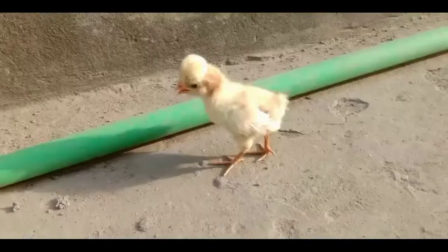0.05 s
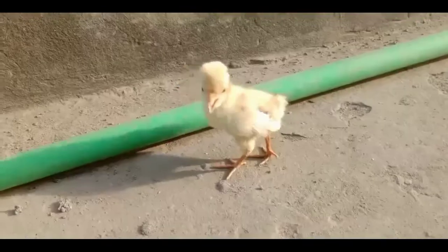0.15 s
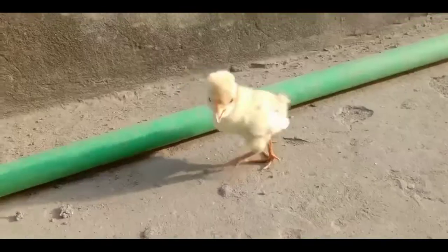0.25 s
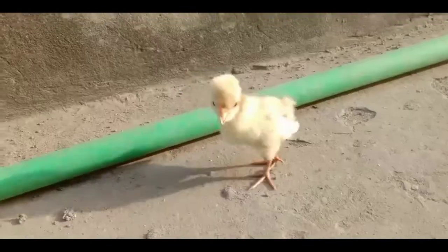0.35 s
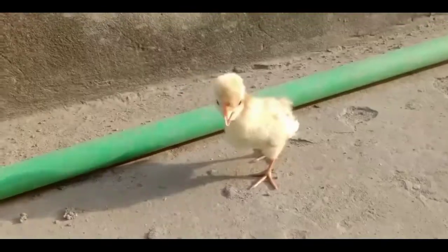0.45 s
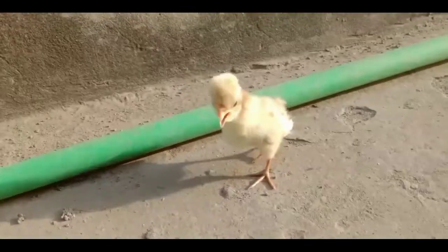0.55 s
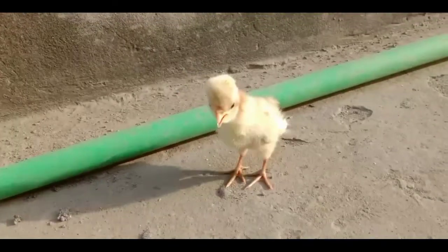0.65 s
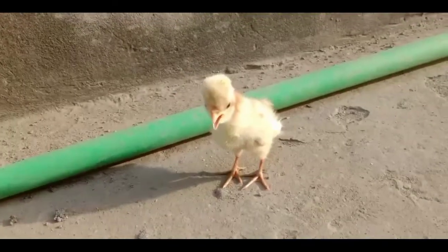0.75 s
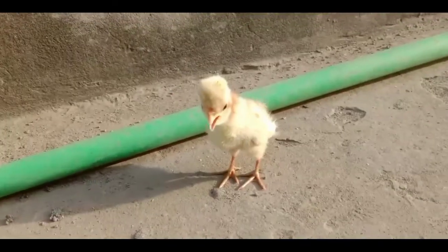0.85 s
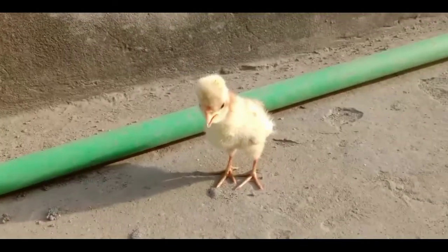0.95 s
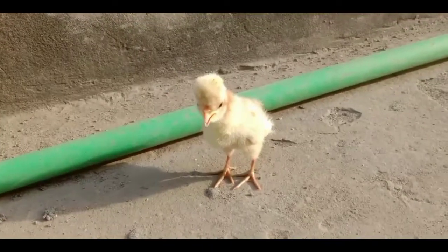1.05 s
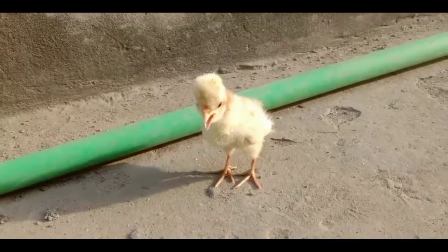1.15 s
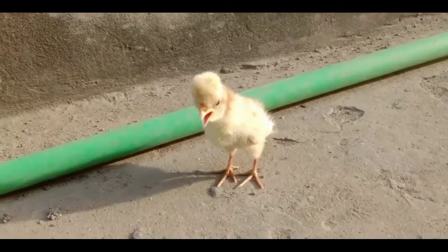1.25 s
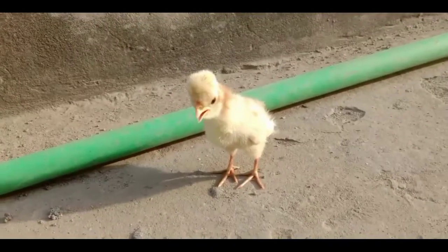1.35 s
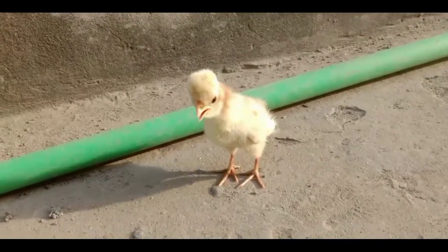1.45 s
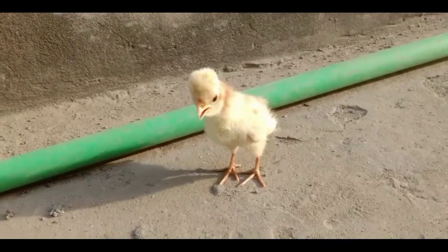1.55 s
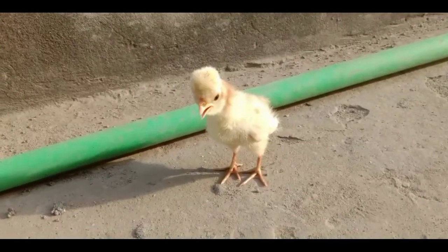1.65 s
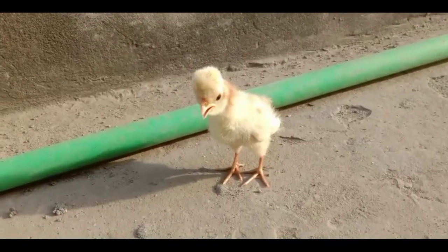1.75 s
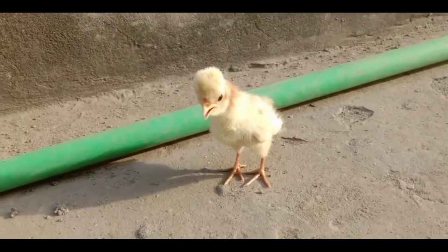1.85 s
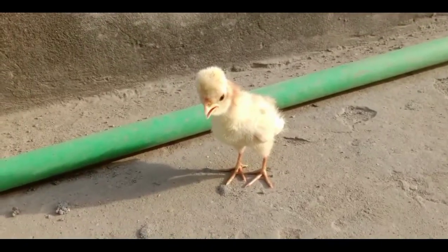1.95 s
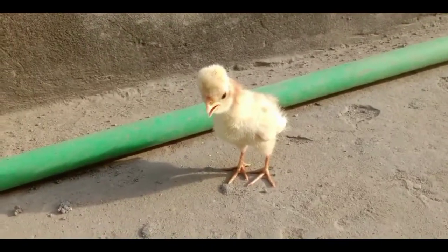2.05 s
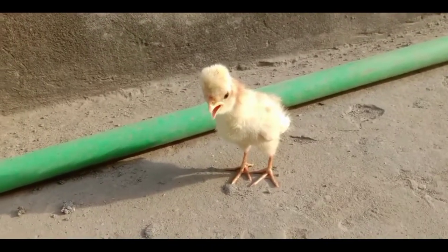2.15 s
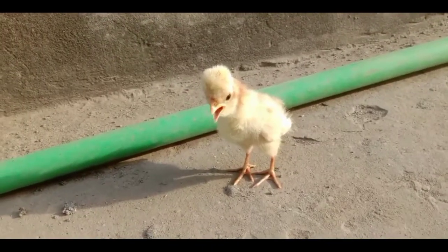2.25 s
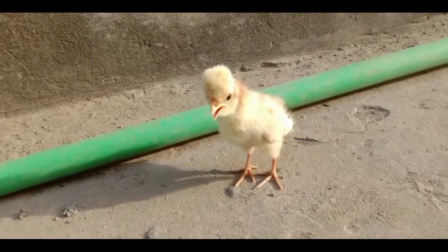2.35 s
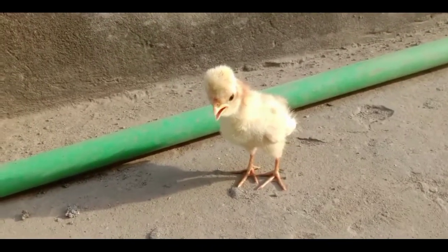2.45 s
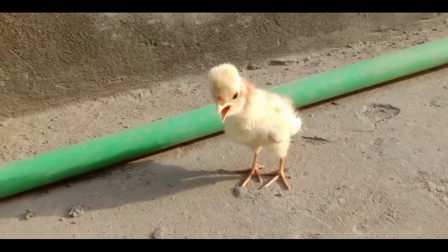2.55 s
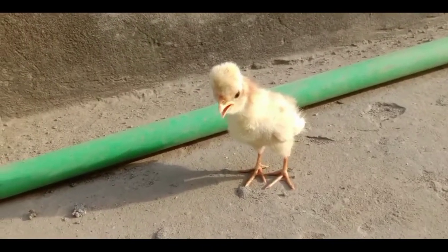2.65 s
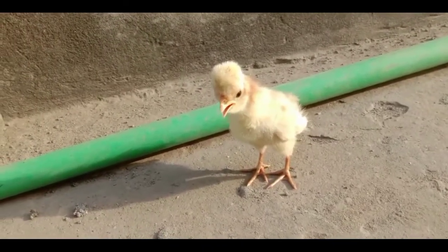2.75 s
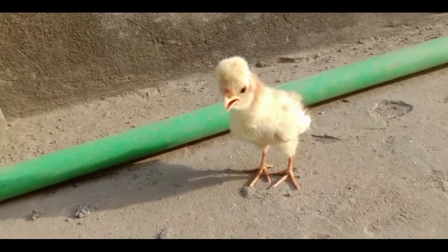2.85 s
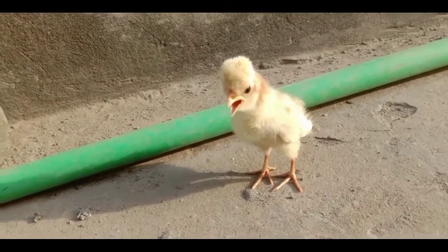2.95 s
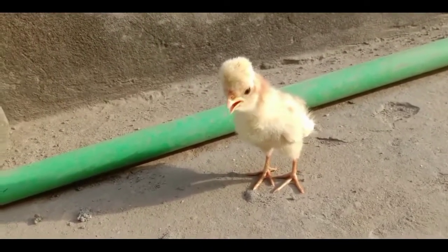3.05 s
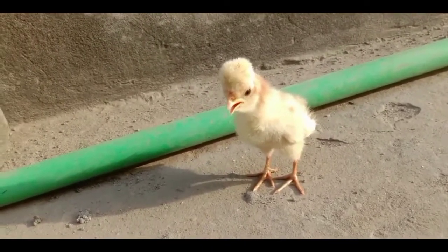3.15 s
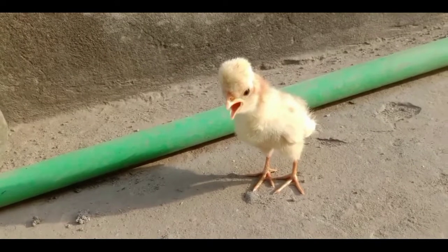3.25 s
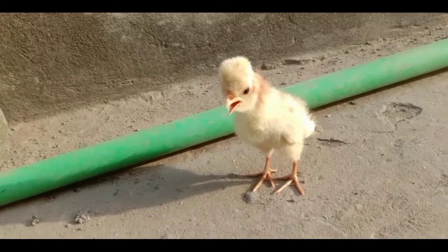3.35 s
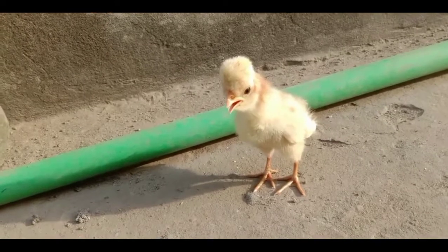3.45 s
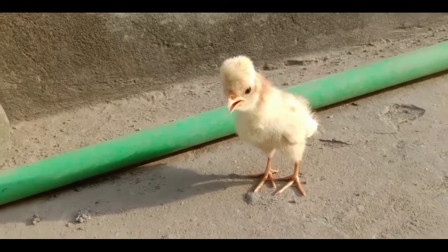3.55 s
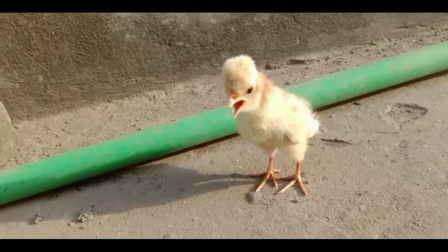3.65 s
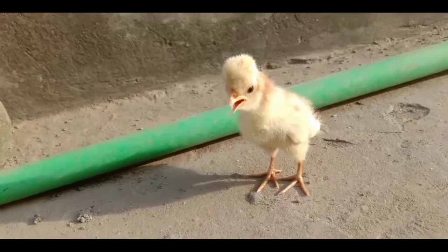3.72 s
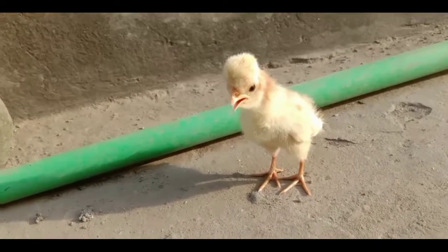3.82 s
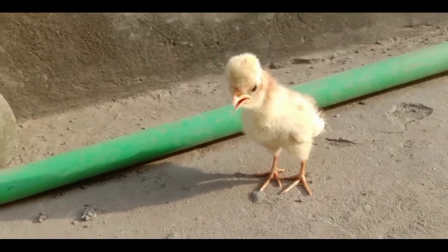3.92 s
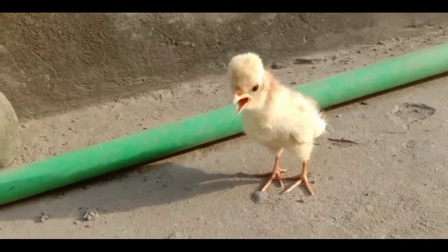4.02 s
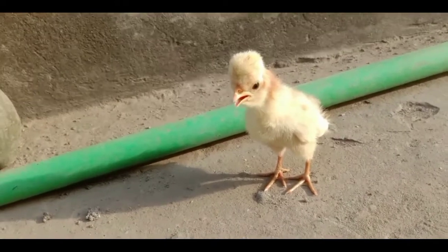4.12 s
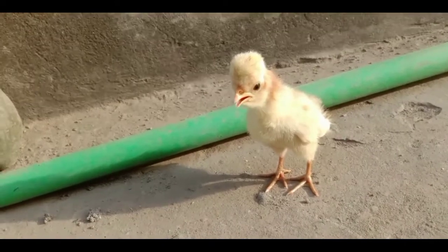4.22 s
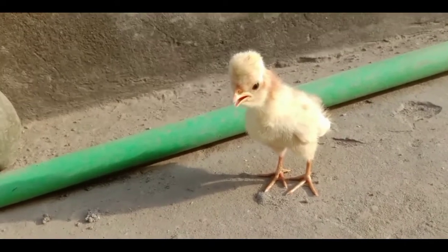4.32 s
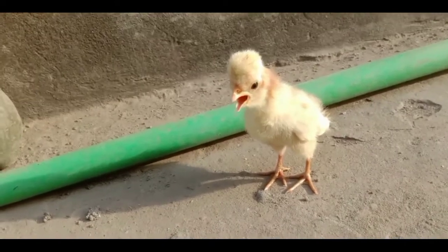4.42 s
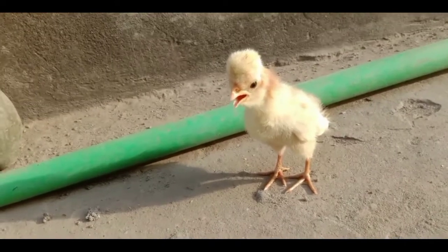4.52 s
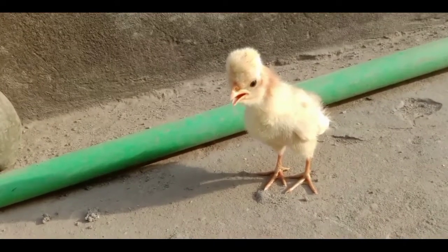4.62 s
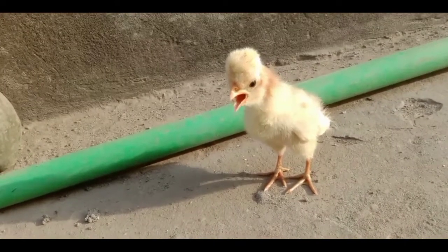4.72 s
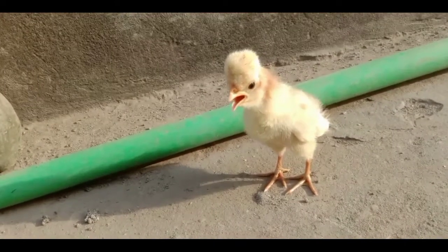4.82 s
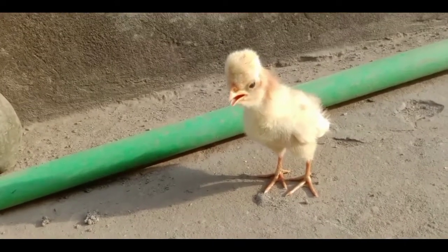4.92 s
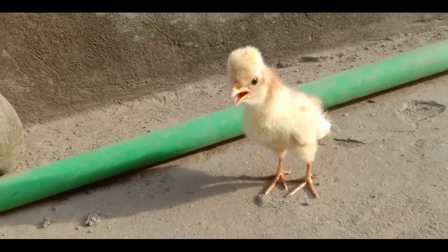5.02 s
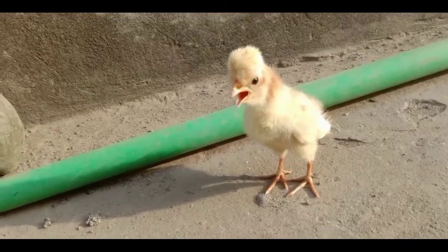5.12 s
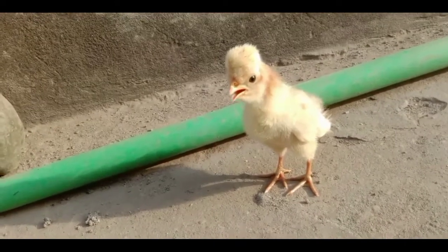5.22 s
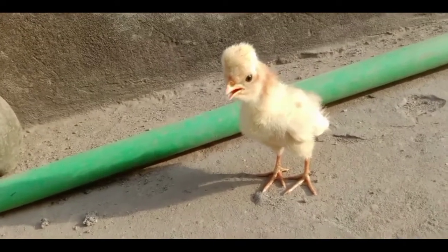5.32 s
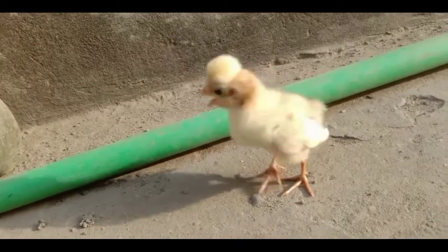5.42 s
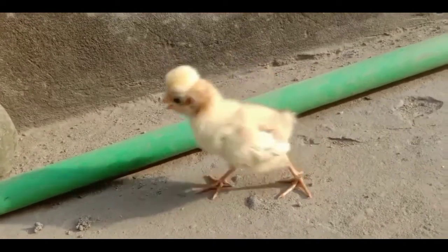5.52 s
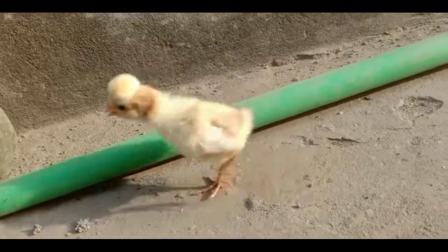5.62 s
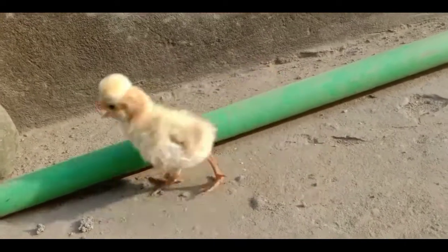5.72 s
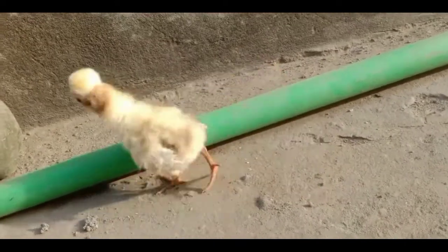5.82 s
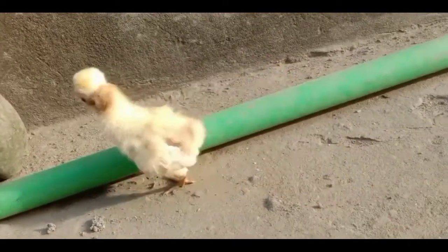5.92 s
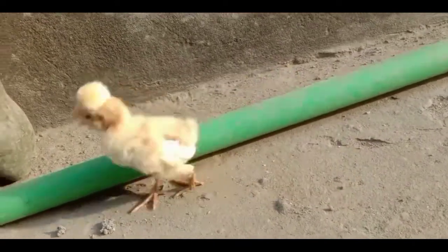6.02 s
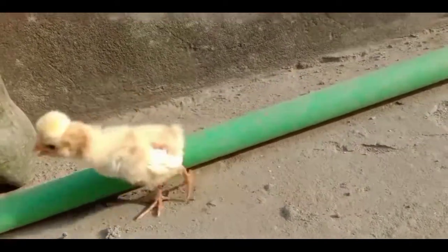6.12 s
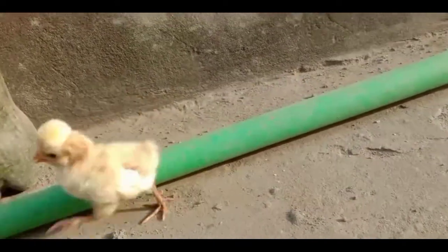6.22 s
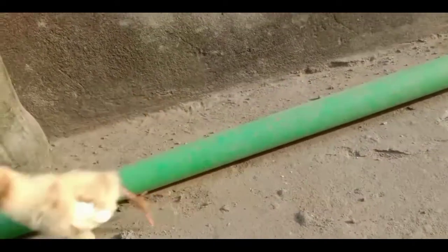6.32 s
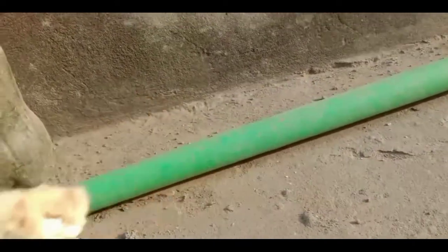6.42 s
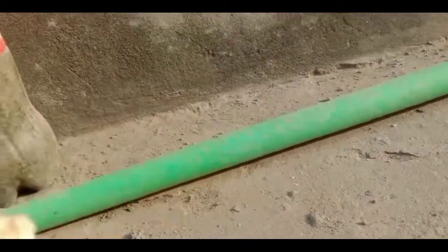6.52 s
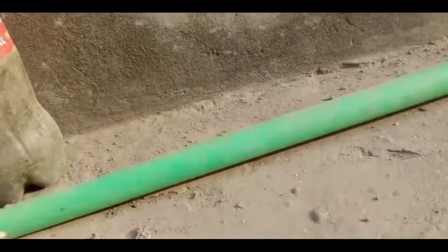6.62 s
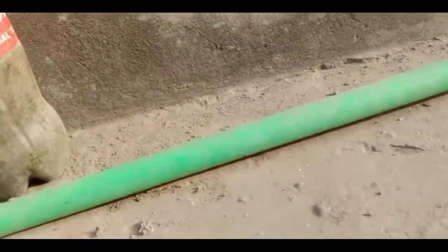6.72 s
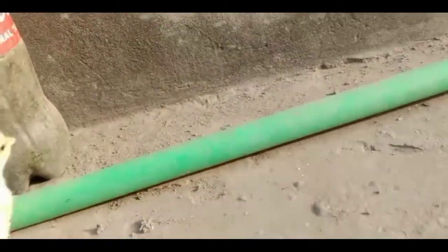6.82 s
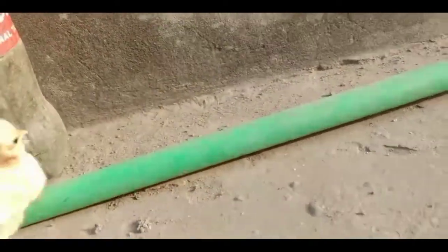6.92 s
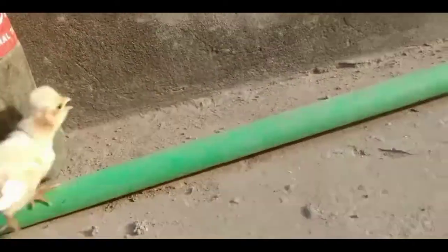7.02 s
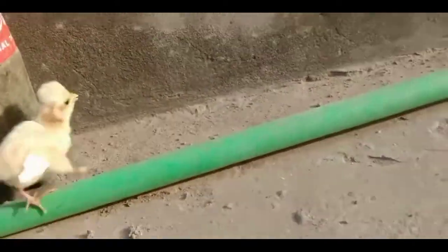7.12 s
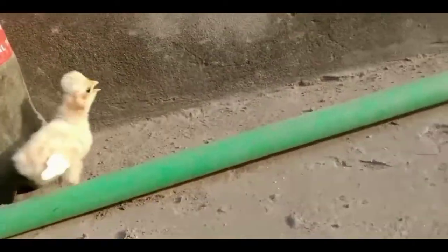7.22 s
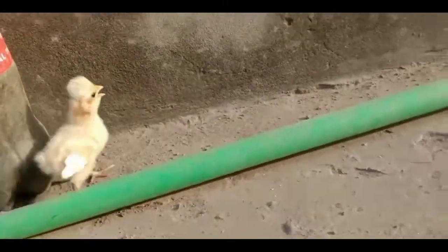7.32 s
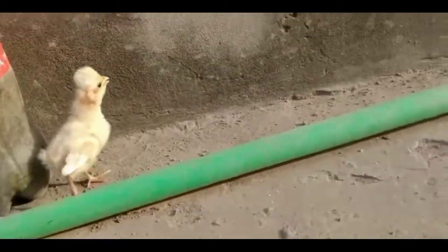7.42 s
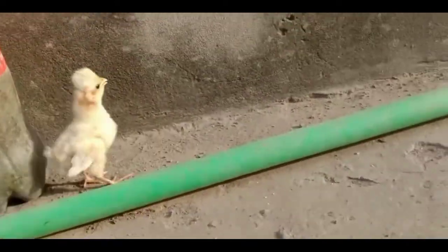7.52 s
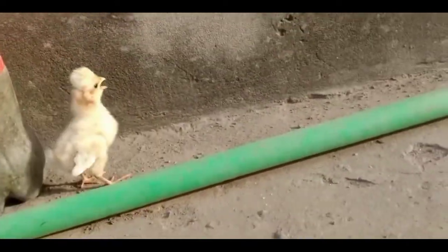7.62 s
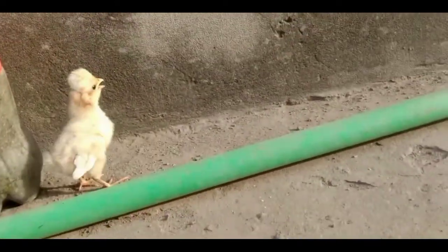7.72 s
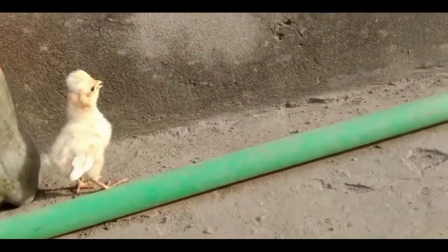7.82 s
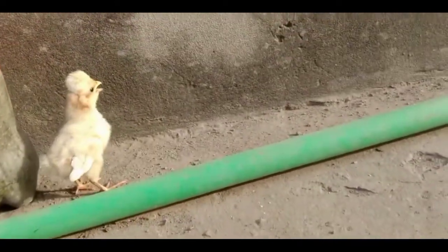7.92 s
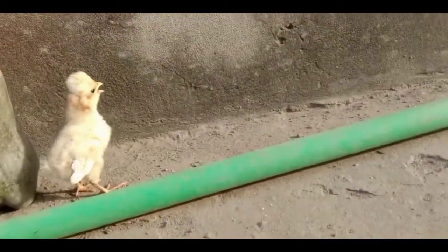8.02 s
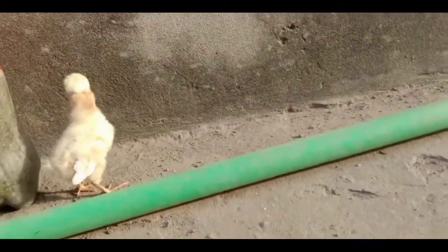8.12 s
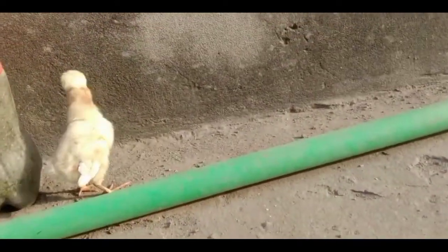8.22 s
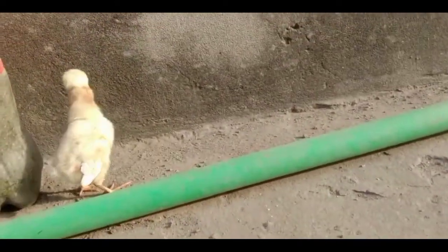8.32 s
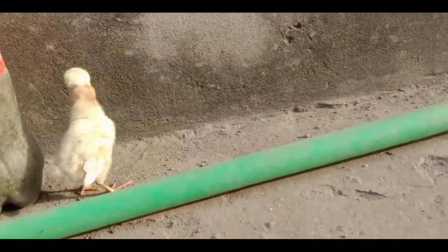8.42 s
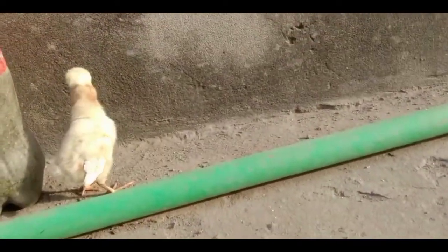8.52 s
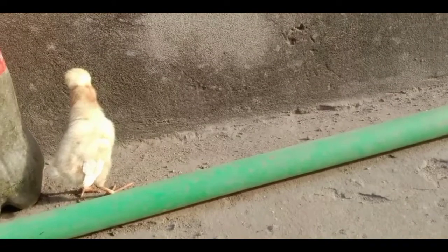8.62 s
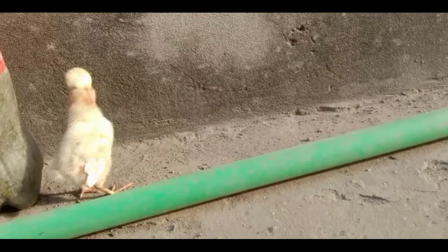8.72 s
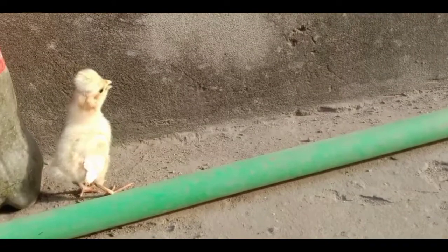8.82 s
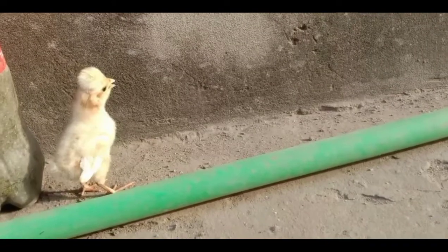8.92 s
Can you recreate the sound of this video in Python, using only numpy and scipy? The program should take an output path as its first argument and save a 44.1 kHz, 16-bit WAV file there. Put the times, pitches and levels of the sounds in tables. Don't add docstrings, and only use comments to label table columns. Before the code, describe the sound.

A short loud burst of yard noise cuts to near silence, then a close chick starts peeping, shrill and regular, each peep dropping sharply in pitch. Fainter chicks cheep irregularly behind it. Small hollow taps of beaks and feet and a few soft hen clucks sit under a low hum. Concrete yard by a wall, phone microphone close.

```python
import sys
import numpy as np
from scipy import signal
from scipy.io import wavfile
from scipy.ndimage import uniform_filter1d

SR = 44100
rng = np.random.default_rng(int(sys.argv[2]) if len(sys.argv) > 2 else 0)


def invert_db(level):
    return 10 ** (np.asarray(level, dtype=float) / 20)


def wrap_up_sound(samples):
    columns = np.atleast_2d(samples).T
    tamed = np.clip(columns, -1, 1)
    steps = np.round(tamed * 32767).astype(np.int16)
    wavfile.write(sys.argv[1], SR, steps)


N = 395136
TOP_HZ = 15800


def at_hz(points, hz):
    point_hz, point_db = np.transpose(points)
    return np.interp(np.log(hz), np.log(point_hz), point_db)


def drift(rate_hz):
    r = np.exp(-2 * np.pi * rate_hz / SR)
    slow = signal.lfilter([1], [1, -2 * r, r * r], rng.standard_normal(N + SR))[SR:]
    return slow / slow.std()


def bandpass(order, low_hz, high_hz, x):
    return signal.sosfilt(signal.butter(order, [low_hz, high_hz], "band", fs=SR, output="sos"), x)


def lowpass(order, top_hz, x):
    return signal.sosfilt(signal.butter(order, top_hz, fs=SR, output="sos"), x)


def add(out, s, sound):
    at = max(round(s * SR), 0)
    out[at:at + len(sound)] += sound[:N - at]


# (frequency [Hz], density [dB per Hz])
YARD = [(18, -45), (30, -37), (124, -2), (286, -14), (754, -13.5), (930, -12), (1060, -7.5), (2720, -34.5),
        (4040, -37.5), (4980, -17.5), (7370, -73.5), (15800, -59)]
# (time [s], level [dB])
BUSTLE = [
    (0, -28.5),
    (.19, -61),
    (.55, -46),
    (4, -48),
    (5.1, -46.5),
    (5.6, -48),
    (7.4, -50),
    (8, -45.5),
    (8.96, -43.5),
]


def yard():
    edges = 45 * 2 ** np.arange(0, 8.6, .5)
    white = rng.standard_normal((2, N))
    together, own, patches = drift(18.6), drift(55), drift(4.4)
    out = 0
    for k, (low_hz, high_hz) in enumerate(zip(edges, edges[1:])):
        band = bandpass(2, low_hz, high_hz, white[k % 2])
        flicker_db = 2 * together + 1.9 * np.roll(own, k * N // 20) + 3.55 * np.roll(patches, k * N // 19)
        out = out + band * invert_db(at_hz(YARD, np.sqrt(low_hz * high_hz)) + flicker_db)
    bustle_db = np.interp(np.arange(N) / SR, *np.transpose(BUSTLE))
    return invert_db(bustle_db) * (out / out.std() + drone())


# (frequency [Hz], level [dB], swing [dB])
DRONES = [
    (118.8, -3, 2),
    (304, -25, 4),
    (419.4, -12.5, 3.5),
    (737, -17.5, 6),
    (1308, -24, 2),
]


def drone():
    width_hz = 26
    r = np.exp(-np.pi * width_hz / SR)
    out, swing = 0, drift(2.75)
    for k, (hz, db, swing_db) in enumerate(DRONES):
        poles = [1, -2 * r * np.cos(2 * np.pi * hz / SR), r * r]
        ring = signal.lfilter([1, 0, -1], poles, rng.standard_normal(N))
        out = out + invert_db(db + swing_db * np.roll(swing, k * SR)) * ring / ring.std()
    return out


# (time [s], length [s], middle pitch [Hz], effort [dB])
DIVES = [(.621, 0.053, 3650, -44), (.657, 0.048, 3280, -33), (1.021, 0.037, 2990, -26.5),
         (1.305, 0.034, 3390, -27.5), (1.358, 0.036, 3150, -36), (1.445, 0.025, 3250, -29),
         (1.872, .075, 3600, -52), (1.392, 0.047, 3014, -27), (1.613, 0.038, 3260, -27),
         (1.701, 0.032, 3070, -36), (6.2, 0.073, 3750, -52), (6.613, 0.032, 3200, -33),
         (2.974, 0.059, 3440, -35), (8.700, 0.036, 2885, -39), (6.680, 0.033, 2974, -35),
         (5.168, 0.041, 3170, -31.5), (5.229, 0.055, 3350, -34.5), (5.644, 0.028, 3300, -32.5),
         (6.839, 0.054, 3430, -33), (7.140, 0.042, 3290, -36.5), (7.924, 0.035, 3020, -32.5),
         (8.476, 0.041, 3190, -32), (8.905, 0.027, 2820, -23)]
# (time [s], length [s], middle pitch [Hz], effort [dB])
SLIDES = [(.028, 0.033, 3060, -36.5), (.190, 0.037, 3030, -37), (.382, 0.044, 3360, -35.5),
          (.953, 0.049, 3630, -43), (1.066, 0.057, 3320, -30), (1.087, 0.041, 3510, -34.5),
          (5.49, 0.032, 3160, -34), (1.963, 0.047, 3390, -31.5), (2.269, 0.039, 3320, -33),
          (2.417, 0.051, 3155, -36), (2.723, 0.041, 3430, -33.5), (3.385, 0.041, 3215, -31),
          (3.518, 0.038, 3390, -36.5), (3.739, 0.04, 3410, -33.5), (4.294, 0.042, 3370, -31),
          (4.547, 0.044, 3570, -27.5), (4.882, 0.044, 3460, -31.5), (5.397, 0.045, 3590, -40),
          (5.505, 0.065, 3630, -33.5), (5.845, 0.04, 3230, -30), (6.805, 0.029, 3200, -39),
          (4.465, 0.045, 3130, -35.5), (5.125, 0.043, 3150, -34.5), (8.320, 0.022, 2920, -41.5),
          (8.800, 0.036, 3000, -44.5)]
# (time [s], length [s], middle pitch [Hz], effort [dB])
SAGS = [(0, 0.072, 6230, -28), (.411, 0.04, 3070, -31.5), (1.396, 0.053, 4340, -29.5),
        (3.703, 0.029, 4450, -39.5), (5.63, 0.063, 3800, -46), (5.785, 0.08, 4780, -30.5),
        (6.565, 0.061, 4320, -45.5), (3.101, 0.036, 3350, -30.5), (3.156, 0.045, 3200, -42.5),
        (3.545, 0.065, 2700, -39.5), (3.913, 0.03, 3250, -28.5), (3.927, 0.044, 3250, -28),
        (1.335, 0.066, 5100, -37.5), (1.400, 0.023, 3900, -47), (.001, 0.039, 4470, -31),
        (3.550, 0.047, 5480, -45), (8.235, 0.076, 3750, -42.5), (8.844, 0.066, 4270, -34.5),
        (4.573, 0.04, 3470, -36), (5.205, 0.037, 3360, -32), (5.379, .036, 3190, -40.5),
        (5.589, 0.034, 3360, -32.5), (5.649, 0.036, 3530, -35), (6.247, 0.069, 4430, -43.5),
        (6.294, 0.046, 3200, -29), (7.771, 0.047, 3620, -46.5), (8.358, 0.089, 2770, -31.5),
        (8.929, 0.035, 3490, -29)]
# (time [s], length [s], middle pitch [Hz], effort [dB])
ARCHES = [(.420, 0.046, 4800, -42), (.600, 0.066, 5300, -37.5), (1.548, 0.093, 4850, -58.5),
          (1.458, 0.044, 4470, -50), (2.678, 0.049, 4480, -47), (.957, 0.085, 4900, -47.5),
          (1.009, 0.091, 4600, -48.5), (1.029, 0.052, 5200, -42), (3.066, 0.032, 4670, -44),
          (3.339, 0.045, 4580, -39), (3.475, 0.051, 4370, -42.5), (3.882, 0.03, 4970, -34),
          (4.501, 0.057, 4980, -43), (4.834, 0.044, 5020, -40.5), (5.177, 0.073, 5100, -43),
          (7.876, 0.054, 4370, -43), (8.277, 0.041, 4200, -33.5), (8.640, 0.035, 4720, -39.5),
          (8.855, 0.051, 4270, -55), (6.616, 0.019, 4900, -33.5), (6.797, 0.05, 5050, -47),
          (8.882, 0.05, 4900, -33)]
# (time [s], length [s], middle pitch [Hz], effort [dB])
HOOKS = [(1.912, 0.07, 3800, -46), (2.7, 0.062, 2450, -34.5), (6.312, 0.068, 3500, -46),
         (2.8, 0.03, 3980, -42), (4.112, .068, 3570, -52), (4.232, 0.078, 4820, -45.5),
         (7.105, 0.056, 4900, -53.5), (6.4, 0.073, 2000, -40), (6.282, 0.054, 2560, -25),
         (5.560, 0.052, 4700, -45), (5.990, 0.053, 4130, -52), (6.290, 0.11, 4550, -42),
         (7.421, 0.048, 2714, -28), (8.140, 0.062, 2687, -28.5), (8.440, 0.042, 4440, -38.5)]
# (time [s], length [s], middle pitch [Hz], effort [dB])
RISES = [
    (2.884, 0.053, 4100, -43),
]
# (time [s], length [s], middle pitch [Hz], effort [dB])
SWOOPS = [
    (.245, .118, 4815, -39.5),
    (.711, 0.081, 4550, -42),
    (2.075, 0.11, 4530, -53),
    (2.668, 0.051, 3960, -38),
]
# (time [s], length [s], middle pitch [Hz], effort [dB])
DROOPS = [
    (6.518, .062, 2784, -31),
    (3.800, 0.078, 2950, -36.5),
    (3.965, 0.065, 3550, -45),
]
GLIDES = [
    (DIVES, 1.28, 1.13, .87, 0.776),
    (SLIDES, 1.17, 1.08, .87, 0.748),
    (SAGS, 1.075, 1.05, .91, .83),
    (ARCHES, .91, 0.97, 0.97, .85),
    (HOOKS, .93, 1.02, .91, .82),
    (RISES, 0.53, 0.88, 1.03, 0.86),
]
GLIDE_SHARES = (0, .2, .5, .8, 1)
BROOD_OVERTONES_DB = (-4.5, -15, -41.5)
PURE_S = [.621, .953, 1.358, 1.445, 1.872, 2.075, 2.668, 3.965, 4.112, 4.465, 4.573, 5.125, 5.205, 5.379,
          5.397, 5.649, 6.2, 6.282, 6.294, 6.518, 6.613, 6.805, 7.924, 8.32, 8.358, 8.905]


def brood():
    pure_db, deep_db, thin_db_per_khz, break_hz = -14, -12, -23.5, 3900
    out, waver = np.zeros(N), drift(140)
    falls = [(SWOOPS, .92, 1.12, .75, .57), (DROOPS, 1.04, 1.13, .89, .83)]
    for rows, first, early, late, last in GLIDES + falls:
        for s, length_s, hz, effort_db in rows:
            u = np.linspace(0, 1, int(length_s * SR))
            ratio = np.interp(u, GLIDE_SHARES, (first, early, 1, late, last))
            pitch = hz * uniform_filter1d(ratio, size=len(u) // 5, mode="nearest")
            pure = np.abs(np.subtract(PURE_S, s)).min() < .003
            thin_db = thin_db_per_khz * np.maximum(pitch - break_hz, 0) / 1000
            thin_db = thin_db + pure_db * pure + deep_db * (hz < 2900)
            overtones_db = [db + thin_db for db in BROOD_OVERTONES_DB]
            flutter_db = 3.44 * np.resize(waver[int(s * SR):], len(u))
            add(out, s, whistle(pitch, effort_db + flutter_db, overtones_db, fade_s=0.0091))
    return out


# (frequency [Hz], gain [dB])
COLOUR = [(2000, -17.5), (2700, -3), (3350, 6), (3850, 4), (4600, 10.5), (5050, 11), (5330, 7), (5650, 7.5),
          (6000, 4.5), (6700, -2.5), (7600, -16.5), (8600, -34), (10100, -20.5), (11200, -21.5),
          (13300, -9.5), (15500, -30.5)]


def whistle(hz, effort_db, overtones_db, fade_s):
    phase = 2 * np.pi * np.cumsum(hz) / SR
    t = np.arange(len(hz)) / SR
    fade = np.sin(np.pi / 2 * np.clip(np.minimum(t, t[-1] - t) / fade_s, 0, 1))
    partials = 0
    for k, db in enumerate([0, *overtones_db], 1):
        level = invert_db(db + at_hz(COLOUR, k * hz)) * (k * hz < TOP_HZ)
        partials = partials + level * np.sin(k * phase)
    return np.sqrt(2) * invert_db(effort_db) * fade * partials


# (voice break [s], top of hook to break [s], low voice lasts [s], top [Hz], effort [dB])
PEEPS = [(0.489, 0.069, 0.062, 6770, -27.5), (0.796, 0.053, 0.072, 6700, -23.5),
         (1.197, 0.059, 0.074, 6800, -23.5), (2.206, 0.033, 0.08, 6080, -23),
         (2.57, 0.051, 0.063, 6640, -21.5), (2.926, 0.063, 0.06, 7020, -22.5),
         (3.271, 0.053, 0.07, 6810, -22.5), (3.64, 0.049, 0.066, 6750, -22.5),
         (4.017, 0.052, 0.065, 6430, -22), (4.411, 0.046, 0.084, 6500, -22.5),
         (4.751, 0.064, 0.074, 6620, -24.5), (5.094, 0.071, 0.058, 7150, -24),
         (5.463, 0.086, 0.053, 6440, -26), (5.746, 0.08, 0.061, 6900, -27.5),
         (6.066, 0.078, 0.054, 6640, -24.5), (6.361, 0.065, .061, 6900, -24.5),
         (6.674, 0.061, 0.064, 6580, -23.5), (6.975, 0.07, 0.064, 7000, -25),
         (7.302, 0.086, 0.048, 6720, -24), (7.667, 0.075, 0.06, 6800, -24.5),
         (7.998, 0.069, 0.063, 6930, -23.5), (8.334, 0.062, 0.074, 6690, -25.5),
         (8.699, 0.061, 0.064, 6670, -24)]
# (time [s], shoulder [Hz], sag power of low voice [-], effort of low voice [dB], landing before break [s])
POSTURE = [(0.489, 5740, 3, -28, 0.024), (0.795, 5740, 3.3, -27.5, 0.027), (1.197, 5700, 3.1, -27.5, 0.026),
           (2.206, 5620, 3.75, -25, 0.024), (2.57, 5608, 3.06, -27.5, 0.025),
           (2.926, 5741, 2.9, -28, 0.022), (3.271, 5730, 3.14, -27.5, 0.024),
           (3.639, 5766, 3.4, -28, 0.029), (4.016, 5740, 2.9, -29.5, 0.025),
           (4.411, 5760, 3.5, -27.5, 0.027), (4.75, 5810, 3.4, -27.5, 0.027),
           (5.094, 5900, 2.74, -27, 0.027), (5.461, 5540, 2.05, -29, 0.032),
           (5.746, 5501, 2.3, -27.5, 0.025), (6.066, 5620, 2.3, -29.5, 0.025),
           (6.361, 5620, 2.3, -30.5, 0.019), (6.674, 5730, 2, -32, 0.03), (6.974, 5740, 2.04, -30, 0.025),
           (7.303, 5860, 1.98, -30, 0.022), (7.667, 5940, 1.96, -30, 0.022),
           (7.998, 5790, 2.03, -30, 0.023), (8.334, 5790, 2.03, -30.5, 0.016),
           (8.701, 5790, 2.3, -30.5, 0.02)]
HIGH_VOICE_DB = (-7.5, -50.5, -76)
LOW_VOICE_DB = (3, -1.5, -15)


def near_chick():
    surge_top_db, surge_s = 2.5, 0.0072
    out, waver, jitter = np.zeros(N), drift(160), drift(400)
    when, *posture = np.transpose(POSTURE)
    for break_s, lead_s, tail_s, top_hz, high_db in PEEPS:
        shoulder_hz, sag_power, low_db, landing_s = (np.interp(break_s, when, column) for column in posture)
        s, hz = peep_stations(break_s, lead_s, tail_s, top_hz, shoulder_hz, landing_s)
        t = np.arange(s[0], s[-1], 1 / SR)
        at = (t * SR).astype(int)
        pitch, low = contour(t, s, hz, sag_power)
        swell_db = -13 * np.exp(-(t - s[0]) / 0.031) - 16 * np.exp((t - s[-1]) / 0.011)
        slide_db = -2.5 * np.minimum(np.abs(np.gradient(pitch)), 3) * (1 - low)
        surge_db = surge_top_db * (t > s[3]) * np.exp(-np.maximum(t - s[3], 0) / surge_s)
        flutter_db = (5.5 - 2.26 * low) * np.minimum(waver[at], .5)
        effort_db = high_db + 3 * (1 - low) + low * (low_db - high_db)
        effort_db = effort_db + swell_db + slide_db + surge_db + flutter_db
        effort_db = uniform_filter1d(effort_db, size=110)
        overtones_db = []
        for k, (high, deep) in enumerate(zip(HIGH_VOICE_DB, LOW_VOICE_DB), 1):
            come_and_go_db = 2.0 * k * np.roll(waver, k * SR)[at]
            overtones_db.append(high + low * (deep - high) + come_and_go_db)
        rasp = .009 * np.exp(-((t - (s[1] + s[2]) / 2) / .007) ** 2)
        rough_pitch = pitch * (1 + (.005 + rasp) * jitter[at])
        add(out, s[0], whistle(rough_pitch, effort_db, overtones_db, fade_s=.005))
    return out


def peep_stations(break_s, lead_s, tail_s, top_hz, shoulder_hz, landing_s):
    hook_s, hook_ratio = .013, .86
    step_s, last_s = 0.0089, .005
    rest_s, shelf_ratio = 0.018, 1.072
    shelf_s = min(landing_s + step_s + rest_s, lead_s - .002)
    shoulder_s = min(landing_s + step_s, shelf_s - .002)
    before = [(lead_s + hook_s, hook_ratio * top_hz), (lead_s, top_hz), (shelf_s, shelf_ratio * shoulder_hz),
              (shoulder_s, shoulder_hz), (landing_s, 4900), (last_s, 4490)]
    after = [(0, 3430), (1, 2000)]
    high_voice = [(break_s - s, hz) for s, hz in before]
    low_voice = [(break_s + u * tail_s, hz) for u, hz in after]
    return np.transpose(high_voice + low_voice)


def contour(t, s, hz, sag_power):
    high = uniform_filter1d(np.interp(t, s[:-2], hz[:-2]), size=220, mode="nearest")
    share = np.clip((t - s[-2]) / (s[-1] - s[-2]), 0, 1)
    low = hz[-2] + (hz[-1] - hz[-2]) * share ** sag_power
    broken = np.sin(np.pi / 2 * np.clip((t - s[-2]) / .005 + .8, 0, 1)) ** 2
    return high + broken * (low - high), broken


def breath(voice):
    air = bandpass(3, 11800, TOP_HZ, rng.standard_normal(N))
    envelope = np.sqrt(uniform_filter1d(np.abs(voice), size=200) + 1e-9)
    return invert_db(-50.5 + 9.6 * drift(60)) * envelope * air


def walls(x, t60_s, first_s):
    t = np.arange(SR // 2) / SR
    hits = rng.random(len(t)) < np.clip(t * 1.5, .01, 1)
    echo = rng.standard_normal(len(t)) * hits * invert_db(-60 * t / t60_s) * (t > first_s)
    echo = lowpass(4, 7000, echo)
    return signal.fftconvolve(x, echo / np.sqrt(np.sum(echo ** 2)))[:N]


def ducking(loud, floor_db, depth, release_db_s):
    level_db = 10 * np.log10(uniform_filter1d(loud ** 2, size=700) + 1e-10)
    ramp = release_db_s * np.arange(N) / SR
    held = np.maximum.accumulate(np.maximum(level_db - floor_db, 0) + ramp) - ramp
    return invert_db(-depth * uniform_filter1d(held, size=300))


# (time [s], peak level [dB], ring [Hz])
TAPS = [(0.814, -12, 746), (0.985, -18.5, 887), (1.608, -16.5, 770), (1.87, -13.5, 1324),
        (2.143, -21.5, 696), (2.283, -12.5, 1030), (2.367, -17, 870), (2.416, -7, 1350),
        (3.068, -23.5, 1050), (1.696, -45, 880), (3.48, -21.5, 1264), (4.220, -32.5, 1170),
        (6.354, -26.5, 860), (3.915, -9, 600), (5.542, -18, 1450), (5.831, -18, 660), (6.137, -17.5, 790),
        (6.793, -16.5, 985), (7.159, -17.5, 587), (7.845, -4.5, 717), (7.888, -15, 540), (8.275, -17, 1004),
        (8.568, -9.5, 1200), (2.052, -23.5, 1060), (2.577, -24.5, 947), (3.004, -20.5, 1170),
        (4.735, -28, 1360), (5.779, -20, 660), (7.784, -24.5, 1300), (8.251, -19, 1190),
        (8.378, -23.5, 982), (8.508, -23.5, 1520)]


def taps():
    out, t = np.zeros(N), np.arange(SR // 8) / SR
    for (s, db, hz), chance in zip(TAPS, rng.random((len(TAPS), 2))):
        modes = np.sin(2 * np.pi * hz * t) * invert_db(-60 * t / 0.05)
        for k, c in zip((1.5, 2.1), chance):
            mode_hz = hz * (k + 0.34 * c)
            modes += invert_db(-8.0 * c) * np.sin(2 * np.pi * mode_hz * t) * invert_db(-60 * t / 0.011)
        noise = rng.standard_normal(len(t))
        dull = bandpass(3, 400, 2400, noise)
        crack = (invert_db(10.5) * dull + invert_db(-27.0) * noise) * invert_db(-60 * t / 0.039)
        rise = np.minimum(t / .0025, 1)
        add(out, s, invert_db(db - 10.5) * (modes + crack) * rise)
    return out


def hiss():
    from_s, level_db = 1.7, -68
    band = bandpass(3, 14600, TOP_HZ, rng.standard_normal(N))
    late = np.clip((np.arange(N) / SR - from_s) * 10, .2, 1)
    return invert_db(level_db + 6.4 * drift(25)) * late * band / band.std()


# (time [s], pitch [Hz], level [dB])
CLUCKS = [
    (4.25, 438, -59),
    (6.1, 424, -60),
    (6.24, 439, -55),
    (6.37, 417, -66),
    (6.47, 421, -72),
    (6.539, 421, -68),
    (6.599, 414, -72),
    (8.1, 405.6, -57),
    (8.25, 414, -55),
    (8.91, 386, -53.5),
]


def hen():
    out, u = np.zeros(N), np.linspace(0, 1, int(.055 * SR))
    hoarse = invert_db(5.8 * drift(44))
    for s, hz, db in CLUCKS:
        phase = 2 * np.pi * np.cumsum(hz * (1.02 - .04 * u)) / SR
        harmonics = sum(invert_db(g) * np.sin(k * phase) for k, g in enumerate((13.0, 13.0, 9.0, -5), 1))
        add(out, s, invert_db(db) * np.sin(np.pi * u) * harmonics)
    return out * hoarse


def scene():
    near, far, knocks = near_chick(), brood(), taps() + hen()
    wet = invert_db(-16.5) * walls(near, 0.16, first_s=.003)
    wet = wet + invert_db(-18.0) * walls(far + knocks, 0.16, first_s=.003)
    duck = ducking(near + far, floor_db=-29, depth=1.5, release_db_s=600)
    ground = lowpass(6, 7200, yard())
    rumble = lowpass(1, 220, ground)
    ground = (ground - rumble) * duck + rumble * duck ** 0.49
    return (near + far + knocks + wet * duck ** .5 + ground + hiss() + breath(near))[None]


def band_limit(x):
    return signal.sosfilt(signal.butter(12, 15920, fs=SR, output="sos"), x)


def record(dry):
    gone_s, back_s = 0.069, 0.19
    t = np.arange(N) / SR
    closing = np.clip((gone_s - t) / 0.0049 + .5, 0, 1) ** 2
    opening = np.clip((t - back_s) / 0.039, 0, 1)
    dry = signal.sosfilt(signal.cheby2(10, 60, 16600, fs=SR, output="sos"), dry)
    return band_limit(dry * (closing + opening))


dry = scene()
out = record(dry)
wrap_up_sound(out)
```